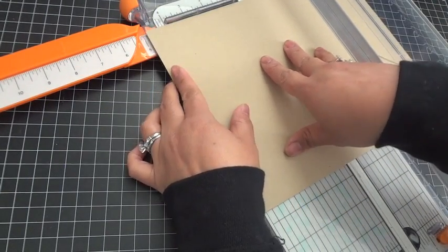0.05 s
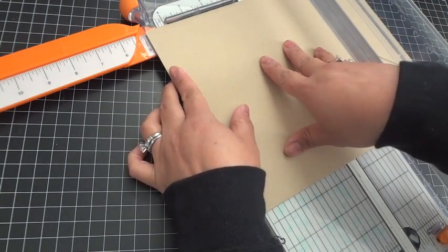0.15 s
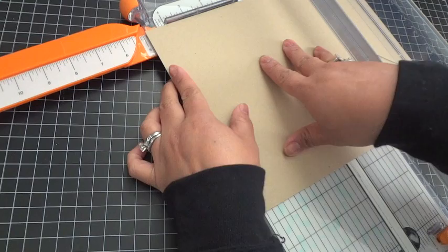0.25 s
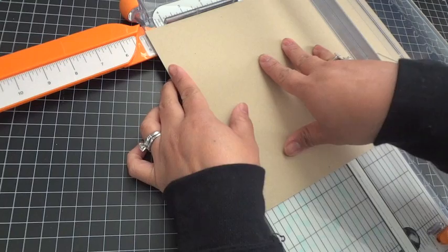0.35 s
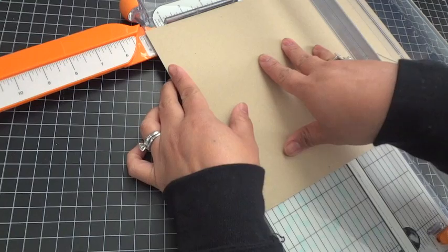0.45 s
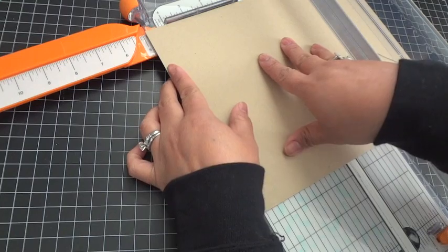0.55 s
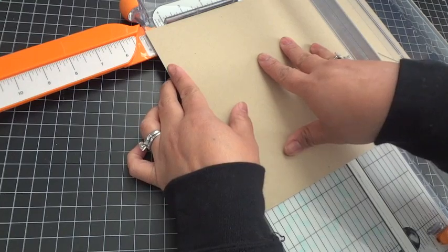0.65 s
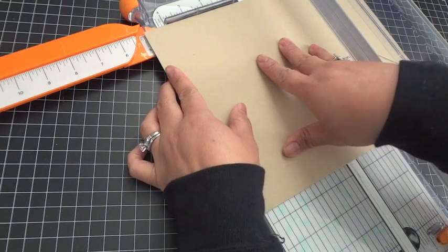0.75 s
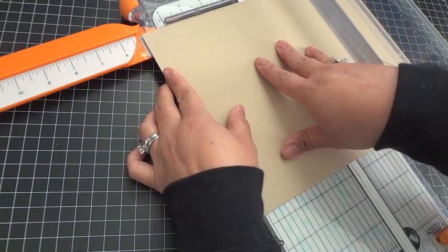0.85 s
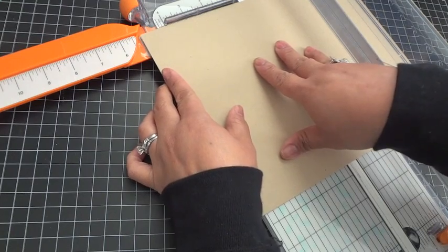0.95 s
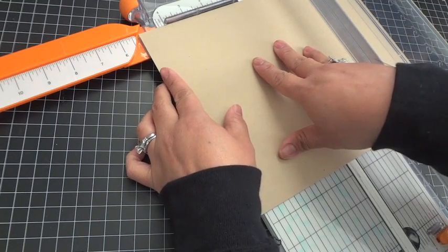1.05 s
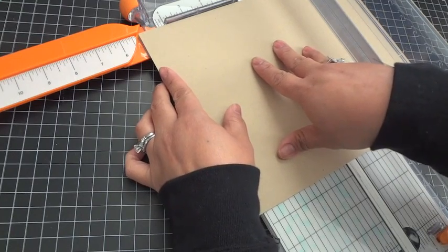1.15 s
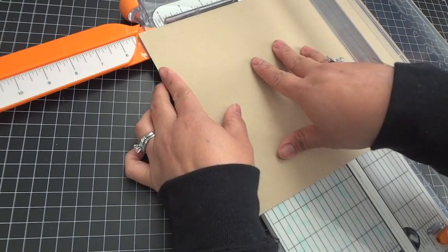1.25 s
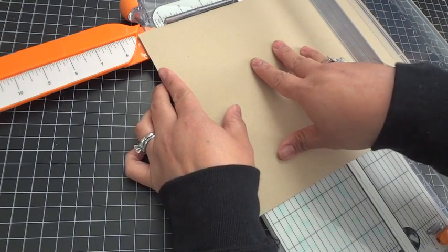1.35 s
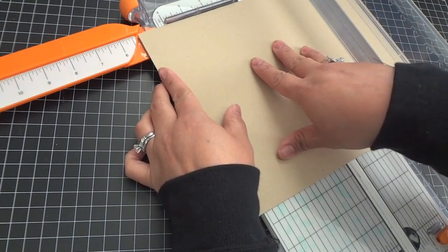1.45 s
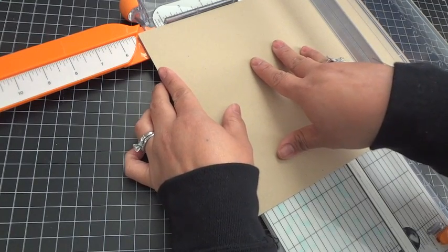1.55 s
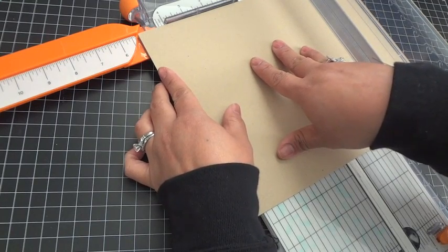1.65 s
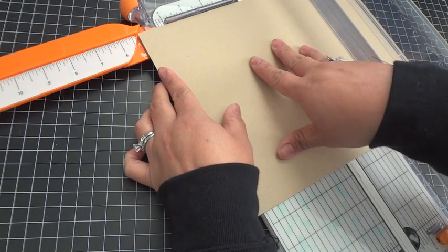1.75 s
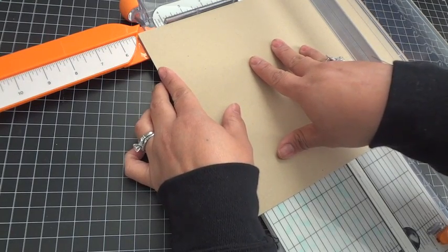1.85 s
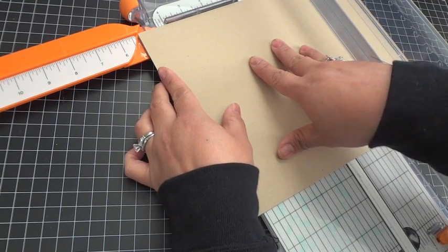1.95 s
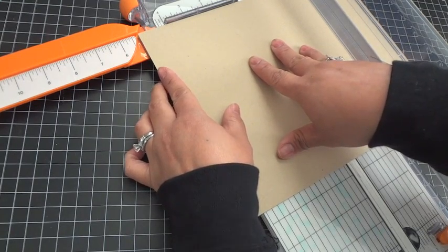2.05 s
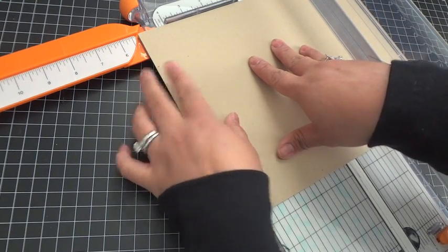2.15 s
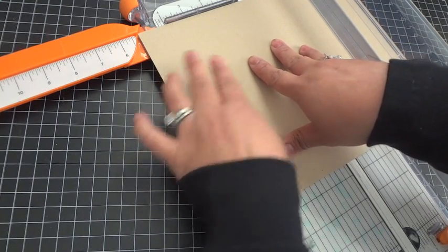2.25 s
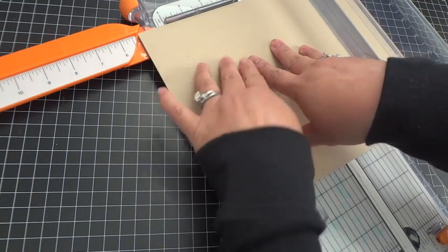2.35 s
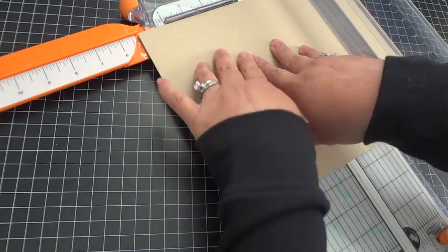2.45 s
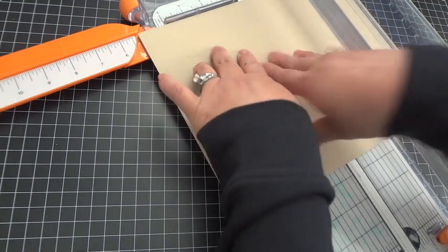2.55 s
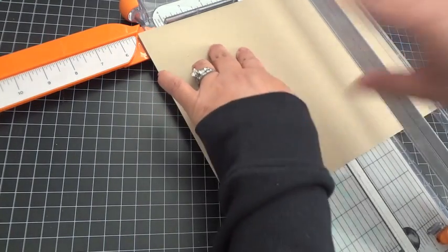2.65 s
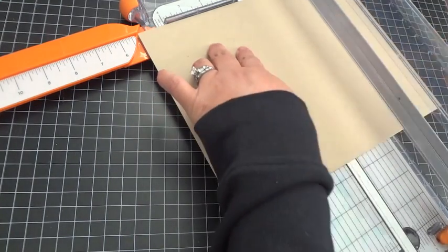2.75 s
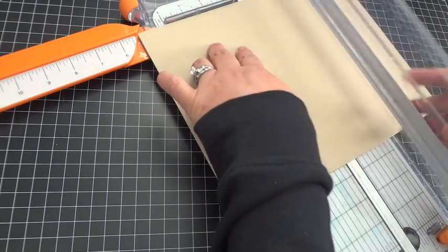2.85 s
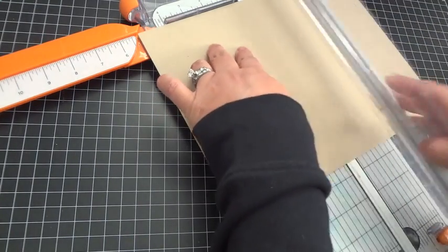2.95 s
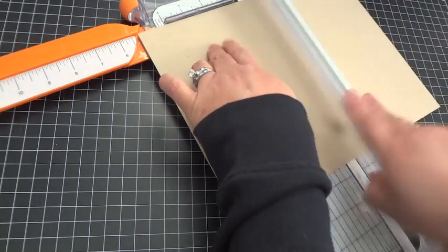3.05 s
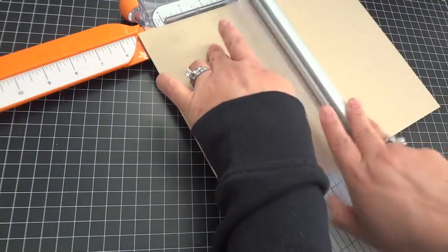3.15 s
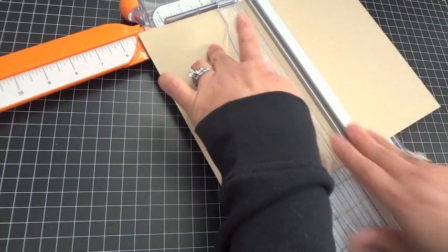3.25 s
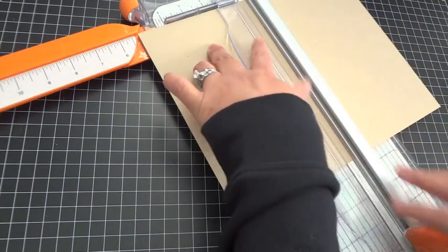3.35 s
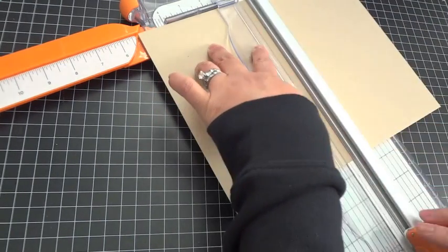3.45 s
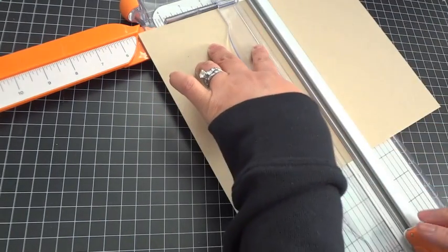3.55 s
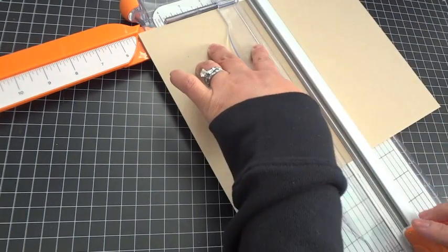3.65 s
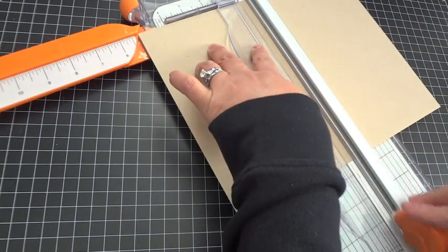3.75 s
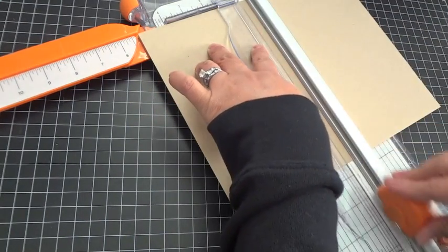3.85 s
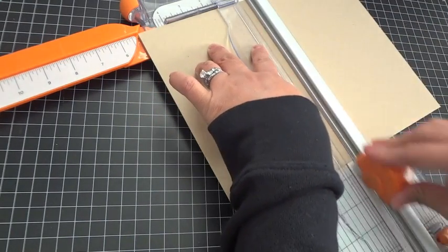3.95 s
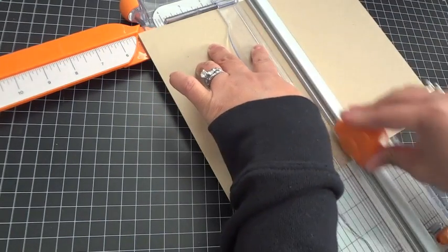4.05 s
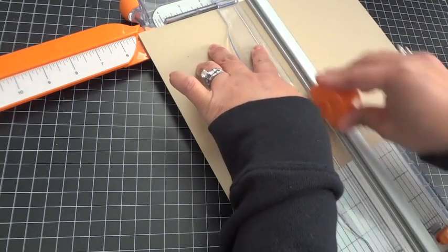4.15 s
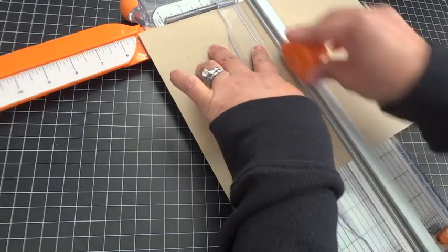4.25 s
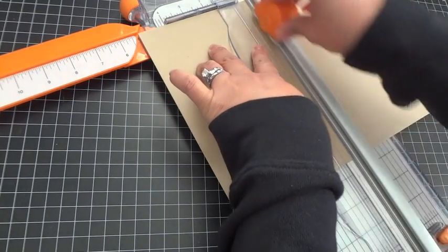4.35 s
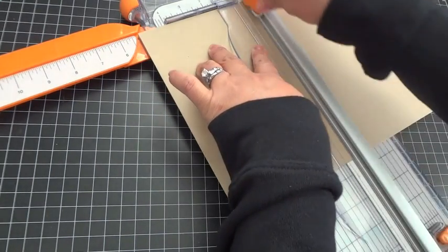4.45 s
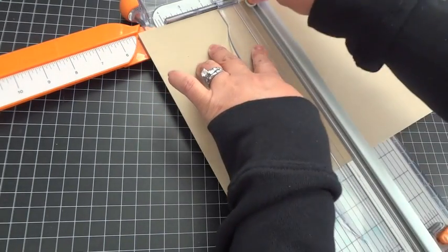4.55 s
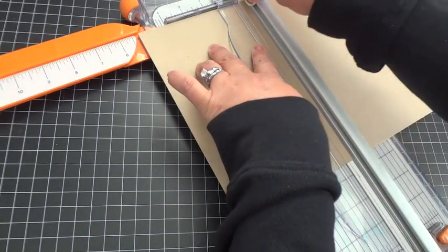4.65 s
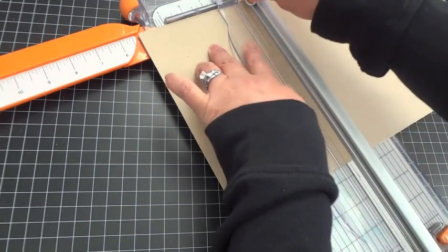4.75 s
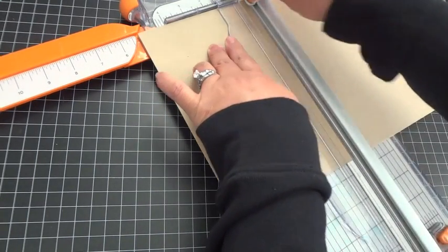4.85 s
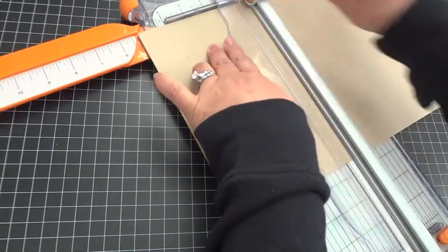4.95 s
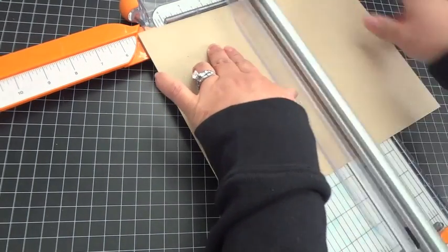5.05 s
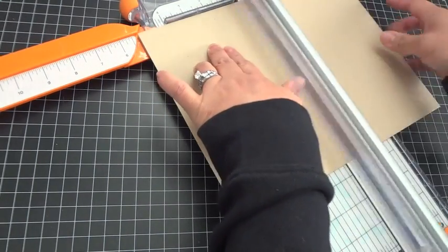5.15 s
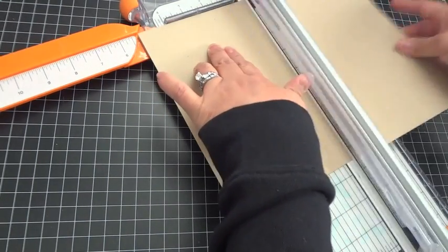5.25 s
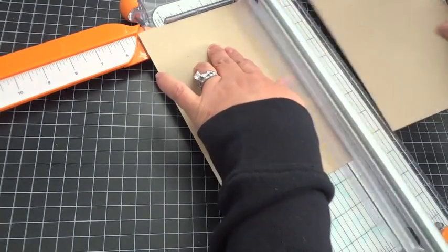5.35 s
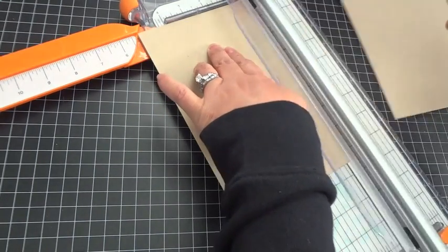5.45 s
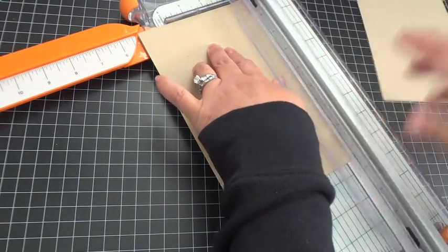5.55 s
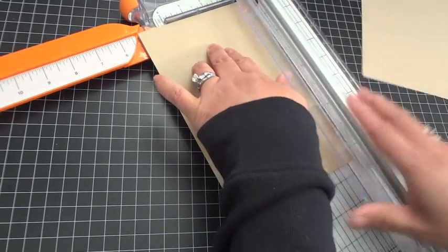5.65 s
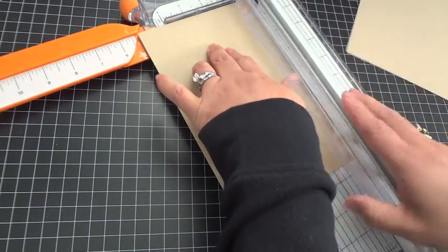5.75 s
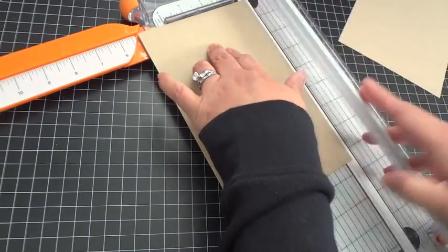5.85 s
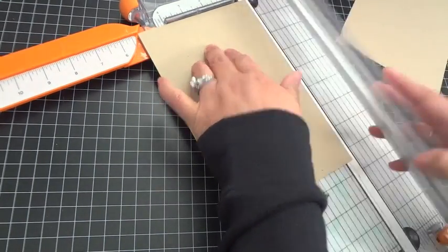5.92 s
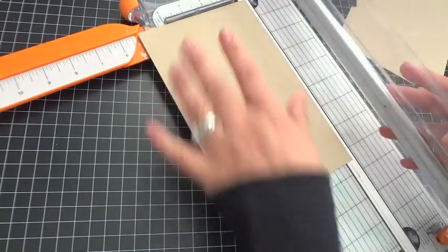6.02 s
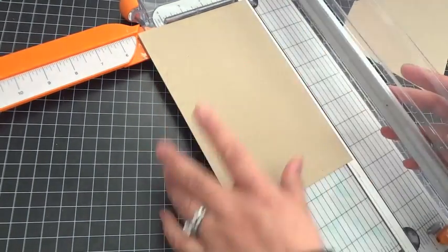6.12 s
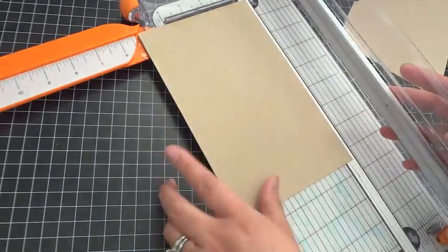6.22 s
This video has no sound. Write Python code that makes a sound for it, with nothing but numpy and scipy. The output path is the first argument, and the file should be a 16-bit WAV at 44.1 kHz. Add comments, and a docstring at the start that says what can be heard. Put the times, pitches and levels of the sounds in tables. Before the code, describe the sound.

A close stereo view of a plastic paper trimmer on a table in a small room, over soft hiss and an extremely high, faint steady whine. A crisp click at 0.04 s and another at 0.63 s; whispery card rubbing with tiny ticks at 0.8-1.0 s, then near quiet, with faint rubs around 2.5 s. From 2.9 s the rail comes down: a light clack, a harder cluster near 3.1 s, and the loudest closing snap at 3.28 s, ringing briefly. Dry little carriage clicks at 3.5-3.6 s and 3.93 s. The blade stroke swells from about 4.0 s, bites card at 4.1 s, gets brighter with a rising bed ring, and fades by 4.6 s. Soft knocks precede a violent bright crack at 5.08 s, then lighter taps and scuffing to 5.5 s, a click at 5.6 s, and faint knocks around 5.8 s before quiet.

```python
"""In a small room, a sheet of card is lined up in a plastic paper trimmer on a craft table.
The clear rail swings down and snaps shut, the blade carriage slides along it and slices the card,
then the rail is pulled open with a clatter. Knocks are short noise bursts with ringing tones added;
sliding, cutting and rubbing are crowds of tiny clicks, each coloured by a filter.
Behind them lie faint filtered noise and a thin electronic whine of two steady tones."""
import sys
import numpy as np
from scipy import signal
from scipy.fft import rfft, irfft, next_fast_len
from scipy.io import wavfile
from scipy.ndimage import uniform_filter1d, map_coordinates

SR = 44100
rng = np.random.default_rng(int(sys.argv[2]) if len(sys.argv) > 2 else 0)


def to_wav(sig):
    """Store sig (one row per channel, or 1-D mono) as 16-bit WAV at the path in sys.argv[1].

    Samples outside -1..1 are clipped; the rate is SR.
    """
    pcm = np.clip(np.atleast_2d(sig), -1, 1) * 32767
    pcm = np.round(pcm).astype(np.int16)
    wavfile.write(sys.argv[1], SR, pcm.T)  # frames by channels


N = 277124  # length in samples
TIME = np.arange(N) / SR  # seconds


def amp(db):
    """Turns decibels into a gain."""
    return 10 ** (np.asarray(db) / 20)


def unit(x):
    """Scales a sound to an rms of 1."""
    return x / np.sqrt(np.mean(x ** 2) + 1e-20)


def read(points, hz):
    """Reads a table by pitch, with straight lines over log frequency."""
    f, value = np.transpose(points)
    return np.interp(np.log(hz + 1), np.log(f + 1), value)


def add(mix, s, sound):
    """Lays a sound into the mix, starting at s seconds."""
    part = mix[max(round(s * SR), 0):][:len(sound)]
    part += sound[:len(part)]


def colour(x, points, peaks=()):
    """Filters by a smooth spectrum, with resonance peaks on top."""
    size = next_fast_len(len(x) + 2048)
    hz = np.fft.rfftfreq(size, 1 / SR)
    db = read(points, hz)
    for f, width, lift in peaks:
        db = db + lift / (1 + (2 * (hz - f) / width) ** 2)
    return irfft(rfft(x, size) * amp(db), size)[:len(x)]


def band(x, low_hz, high_hz, order=2):
    """Keeps only the pitches between two limits."""
    edges = [low_hz, min(high_hz, .49 * SR)]
    return signal.sosfilt(signal.butter(order, edges, "band", fs=SR, output="sos"), x)


def grains(per_s, spread_db):
    """Tiny slips and snaps at random times, most small and a few large."""
    size = amp(spread_db * np.minimum(rng.exponential(1, N), 4))
    sign = rng.choice([-1, 1], N)
    happens = rng.random(N) < per_s / SR
    return unit(size * sign * happens)


def burst(db, low_hz, high_hz, t60, order=2, rise_s=0.00079):
    """A dense cluster of modes struck at once, made from noise; db is the rms of its first 12 ms."""
    t = np.arange(SR // 4) / SR
    swell = (1 - np.exp(-t / rise_s)) * amp(-60 * t / max(t60, .003))
    ring = band(rng.choice([-1, 1], len(t)) * swell, low_hz, high_hz, order)
    return amp(db) * ring / np.sqrt(np.mean(ring[t < .012] ** 2))


def struck(modes):
    """Modes set going at once, each a sine that dies away by itself."""
    t = np.arange(SR // 3) / SR
    out = np.zeros(len(t))
    for hz, db, t60 in modes:
        swell = 1 - np.exp(-t * hz / 2)
        out += amp(db - 60 * t / t60) * swell * np.sin(2 * np.pi * hz * t)
    return out


CLACK_HZ, CLACK_OCTAVES = 2210, 0.9  # pitch of the softest clack, and how far above it the hardest lies
# edge tick against the clack for the softest blow, and what the hardest adds
TICK_DB, TICK_RANGE_DB = -17, 15.5
HEAVY_S = .1  # die-away time of a long, heavy blow
THUMP_HZ, THUMP_SLOPE = 332, 0.23  # table's thump for a heavy blow; shorter blows raise it by this power
# blows on the trimmer: start_s, level_db (of the clack), hardness (0-1),
# bed_db and table_db (against the clack), t60_s (time for the clack to fall 60 dB)
KNOCKS = [(0.036, -38.5, 0.7, -9, -19.5, 0.024), (0.634, -40.5, 0.81, -4, -25, 0.024),
          (2.165, -65.5, 0, 9.5, -6, 0.029), (2.873, -61.5, 0.9, -3, -11, 0.014),
          (2.903, -45, 0.86, 0, -16.5, 0.03), (3.013, -59.5, 0, 2.5, 2, 0.028),
          (3.07, -55.5, 1, 1, -2.5, 0.064), (3.0981, -31.5, 0.6, -2, -20, 0.043),
          (3.104, -35, 1, -4.5, -15, 0.089), (3.131, -44, 0.73, 5, -9.5, 0.066),
          (3.262, -40, 0.63, -9.5, -30, 0.18), (3.281, -25.5, 0.82, -5, -14.5, 0.074),
          (3.296, -26, 0.82, -3, -22, 0.21), (4.665, -54, .5, -2.5, -11.5, 0.035),
          (4.777, -54, 0, 3.5, -14, 0.023), (4.924, -53.5, 0.5, -9, -8.5, 0.042),
          (4.997, -40.5, 0.8, -11, -7.5, 0.0088), (5.011, -45, 0.47, -9, -13, 0.073),
          (5.072, -27.5, 0.18, -4, -43, 0.0047), (5.077, -25.5, 1, -38, -28, 0.041),
          (5.088, -22, .85, -18.5, -35, 0.2), (5.171, -40, 0.5, -3, 2.5, 0.015),
          (5.292, -47, 0.33, -3, -27, 0.024), (5.305, -49.5, 0.8, -6, -22, 0.15),
          (5.329, -37.5, 0, -2, -15.5, 0.017), (5.45, -45.5, 0, -7, -21, 0.023),
          (5.515, -45.5, 0, -12, -16, 0.13), (5.755, -47.5, 0.5, -3, -1.5, 0.059),
          (5.796, -49, 0.29, -6, -16, 0.059), (5.824, -56, 0, 4.5, -3, 0.014),
          (5.8937, -57, 0.97, 8, -4, 0.035)]


def blows(bass_hold=1.52, tick_hold=0.88):
    """Each blow shakes table, bed and rail; harder ones are brighter, and the thump lasts longest."""
    out = np.zeros(N)
    for s, db, hardness, bed_db, table_db, t60 in KNOCKS:
        clack_hz = CLACK_HZ * 2 ** (CLACK_OCTAVES * hardness)
        thump_hz = THUMP_HZ * (HEAVY_S / t60) ** THUMP_SLOPE
        tick_db = TICK_DB + TICK_RANGE_DB * hardness
        thump = burst(db + table_db, thump_hz / 1.45, thump_hz * 1.45, t60 * bass_hold, 3, rise_s=.0012)
        bed = burst(db + bed_db, 820, 1280, t60 * 1.1, 3, rise_s=.0008)
        clack = burst(db, clack_hz / 1.95, clack_hz * 1.55, t60, 3, rise_s=.0014)
        tick = burst(db + tick_db, 6000, 14500, t60 * tick_hold, rise_s=.0009)
        for layer in (thump, bed, clack, tick):
            add(out, s, layer)
    return out


# boom of the base on the table: pitch_hz, level_db (against a heavy blow's level on the bed), t60_s
BASE_MODES = [(101.4, -7, 0.099), (195.4, -6, 0.11), (233, -6.5, 0.13), (423.6, -9, 0.14),
              (923, 3.5, 0.059)]


def base():
    """The base booms in step with the push on the bed: its force times its length."""
    out, boom = np.zeros(N), struck(BASE_MODES)
    for s, db, _, bed_db, _, t60 in KNOCKS:
        add(out, s, amp(db + bed_db) * t60 / HEAVY_S * boom)
    return out


# what the trimmer rings with after every blow: pitch_hz, level_db (before ring_db is added), t60_s
TRIMMER_MODES = [(393, -48, 0.13), (900, -39, 0.45), (1070, -21, 0.32), (1124, -5.5, 0.037),
                 (2000, 3, 0.067), (2180, 8, 0.067), (3560, -46, 0.17), (4000, -27, 0.055)]


def ringing(x, ring_db=-3.0):
    """The trimmer's long modes, driven by the blows, sing on after them."""
    t = np.arange(SR // 2) / SR
    modes = np.zeros(len(t))
    for hz, db, t60 in TRIMMER_MODES:
        even = 2 * np.log(1000) / (t60 * SR)  # makes level_db the mode's gain at resonance
        modes += amp(db - 60 * t / t60) * np.sin(2 * np.pi * hz * t) * even
    return amp(ring_db) * signal.oaconvolve(x, modes)[:N]


def flutter(rate_hz, depth_db):
    """A gain that wanders at random."""
    knots = np.arange(0, TIME[-1] + 1, 1 / rate_hz)
    return amp(depth_db * np.interp(TIME, knots, rng.standard_normal(4096)[:len(knots)]))


def shifting(x, patch_db):
    """Resonances come and go in patches of about 400 Hz by 50 ms as the blade travels; the top stays even."""
    hz, _, z = signal.stft(x, SR, nperseg=512)
    patches = uniform_filter1d(rng.standard_normal(z.shape), size=5, axis=0)
    patches = uniform_filter1d(patches, size=9, axis=1)
    depth_db = patch_db / (1 + (hz[:, None] / 10000) ** 4)
    return unit(signal.istft(z * amp(depth_db * unit(patches)), nperseg=512)[1][:N])


# the carriage is pushed faster, then braked; the end values hold outside: time_s, speed (0-1)
SPEED = [(3.66, 0.06), (4.39, 0.95), (4.47, 0.89), (4.655, 0.01)]
# how much of the blade is in the card: time_s, share (0-1)
IN_CARD = [(4.104, 0), (4.118, 1), (4.548, 1), (4.568, 0)]
# carriage on the rail, rasping in two bands: pitch_hz, level_db
SLIDE_COLOUR = [(150, -40), (450, -22), (740, -5), (950, -14), (1220, -6), (1550, -13), (1980, 3),
                (2650, 2), (3150, -11), (3550, -1), (4500, -3), (6000, -8), (16000, -18)]
# tearing fibres: pitch_hz, level_db
CUT_COLOUR = [(600, -46), (1200, -17.5), (1620, -3), (2050, -9.5), (2560, -9), (3220, -10.5), (4600, -6),
              (7300, -9.5), (9700, -10), (14700, -10), (16000, -16)]
# resonances of the rail that the cut excites: pitch_hz, width_hz, lift_db
RAIL_PEAKS = [(1610, 120, 2), (2050, 160, 3), (2600, 260, 4), (4010, 100, 3), (4650, 350, 3),
              (5570, 130, 3), (6240, 100, 2), (7150, 300, 2)]
# ring of the bed: pitch_hz (before stiffening), level_db
BED_COLOUR = [(450, -26), (680, -21.5), (800, -14.5), (900, -0.5), (1000, 5.5), (1160, 11), (1350, -2),
              (1700, 0.5), (3000, -63)]
# the bed rings higher as the blade nears the hinge: time_s, pitch_factor
BED_STIFFENING = [(4.2, 0.81), (4.42, 0.95), (4.58, 1.1)]
# low drumming of the bed on the table: pitch_hz, level_db
ROLL_COLOUR = [(30, -48), (65, -12), (100, 1), (130, 4.5), (215, 8.5), (300, -4), (420, -8.5), (650, -5.5),
               (1200, -45)]
FRICTION_DB, SPEED_POWER = -30, 1.99  # bare rail at full speed; friction grows as this power of speed
CUTTING_DB, BITE_DB = 6.5, 3.0  # extra level in the card, and size of the jump as the blade bites
FIZZ_DB = 0.5  # fizz of the bare rail against its rasp at full speed
# bed's ring against the friction at the hinge, and how much less at the near end
BED_AT_HINGE_DB, BED_FALL_DB = -1, 40.5
# drumming: level at full speed, loudest place and reach (shares of the rail)
SAG_DB, SAG_PLACE, SAG_WIDTH = -50.5, 0.68, 0.16


def stroke():
    """The carriage scrapes the rail, louder with speed; in the card, snapping fibres take over."""
    speed = np.clip(np.interp(TIME, *np.transpose(SPEED)), 0, None)
    place = np.cumsum(speed) / np.sum(speed)  # 0 at the near end, 1 at the hinge
    in_card = np.clip(np.interp(TIME, *np.transpose(IN_CARD)), 0, 1)
    friction = amp(FRICTION_DB + CUTTING_DB * in_card) * speed ** SPEED_POWER

    slide = shifting(colour(grains(7000, 1.7), SLIDE_COLOUR), 2.0)
    fizz = unit(band(grains(13000, 1.5), 4500, 15000))
    fibres = shifting(colour(grains(13000, 1.8), CUT_COLOUR, RAIL_PEAKS), 3.2)
    bare_rail = slide + amp(FIZZ_DB) * speed * fizz
    scrape = np.sqrt(1 - in_card) * bare_rail + np.sqrt(in_card) * fibres

    # dips then jumps as the blade enters; rises then dips as it leaves
    bite = amp(BITE_DB * (in_card - uniform_filter1d(in_card, size=4000)) * 2)
    drag = flutter(130, .8) * bite  # uneven resistance

    # reading the ring faster raises its pitch
    pace = np.cumsum(np.interp(TIME, *np.transpose(BED_STIFFENING)))
    bed_ring = map_coordinates(unit(colour(grains(4000, 1.6), BED_COLOUR)), [pace])
    bed_ring = bed_ring * amp(BED_AT_HINGE_DB - BED_FALL_DB * (1 - place))

    sag = amp(SAG_DB) * speed * np.exp(-((place - SAG_PLACE) / SAG_WIDTH) ** 2)
    rumble = unit(colour(grains(1500, 0.63), ROLL_COLOUR)) * sag
    return drag * (friction * (scrape + bed_ring) + rumble)


FAVOUR_OCTAVES = .3  # modes this far from the favoured pitch ring about 9 dB less
# the carriage clicks in its play on the rail: start_s, level_db, favoured_hz
CARRIAGE_CLICKS = [(2.96, -48, 2200), (2.972, -63, 2230), (3.039, -59, 2500), (3.476, -55, 3070),
                   (3.491, -35.5, 2400), (3.504, -54, 2340), (3.533, -47, 3170), (3.582, -42, 1940),
                   (3.635, -50, 3050), (3.931, -45, 2404), (4.121, -36, 2810), (5.591, -43, 3580)]
# ring of the carriage: pitch_hz, level_db (against the click, at the favoured pitch), t60_s
CARRIAGE_MODES = [(2143, 5, 0.057), (2210, 6.5, 0.038), (2490, -13, 0.048), (2530, 6, 0.054),
                  (3590, 1, 0.056), (4440, -18, .07)]


def carriage(low_hz=1900, high_hz=5000, t60=.017, tick_db=-20, bed_db=-14):
    """Dry clicks of the small plastic carriage, ringing most near the pitch each click favours."""
    out = np.zeros(N)
    for s, db, favoured_hz in CARRIAGE_CLICKS:
        add(out, s, burst(db, low_hz, high_hz, t60, order=4, rise_s=0.0008))
        add(out, s, burst(db + tick_db, 6000, 14500, t60))
        add(out, s, burst(db + bed_db, 780, 1280, t60))
        for mode in CARRIAGE_MODES:
            favour = np.exp(-(np.log2(mode[0] / favoured_hz) / FAVOUR_OCTAVES) ** 2)
            add(out, s, amp(db) * favour * struck([mode]))
    return out


RUB_ATTACK_S, RUB_RELEASE_S = 0.013, 0.0065


def pressure(strokes):
    """Each rub swells, holds and lets go."""
    out = np.zeros(N)
    for s, length, db in strokes:
        swell = np.clip((TIME - s) / RUB_ATTACK_S, 0, 1)
        let_go = np.exp(-np.clip((TIME - s - length) / RUB_RELEASE_S, 0, 20))
        out += amp(db) * swell * let_go
    return out


# card and fingers slide over the bed: start_s, length_s, level_db (before rub_db is added)
RUBS = [(0.77, 0.18, -54.5), (0.95, 0.037, -49.5), (2.445, 0.073, -64), (2.595, 0.039, -51)]
# colour of these rubs: pitch_hz, level_db
RUB_COLOUR = [(800, -11.5), (3000, -6.5), (4200, 3.5), (5300, 5.5), (8000, 3), (10000, 0.5), (15500, -6)]
# the card's edge catches and lets go: start_s, level_db (before tick_db is added)
CARD_TICKS = [(0.122, -43), (0.783, -45.5), (0.816, -49), (0.959, -44), (0.975, -37.5), (0.994, -47),
              (1.425, -55.5), (6.022, -55)]


def card(rub_db=-0.5, tick_db=-4.0):
    """Card whispers over the bed in many tiny slips, with little catches of its edge."""
    slips = grains(3500, 3.5)
    out = amp(rub_db) * pressure(RUBS) * unit(colour(slips, RUB_COLOUR))
    for s, db in CARD_TICKS:
        add(out, s, burst(db + tick_db, 4300, 8600, 0.016, rise_s=0.000067))
    return out


# the rail's hinge and the card scuff while moved: start_s, length_s, level_db (before scuff_db is added)
SCUFFS = [(2.9, 0.16, -59), (3.07, .025, -60), (3.245, 0.038, -47), (4.9, 0.13, -59.5), (5.24, 0.191, -56)]
# colour of these scuffs: pitch_hz, level_db
SCUFF_COLOUR = [(200, -14), (600, -9), (1000, 0), (1500, -3), (2300, 0), (3000, -9), (5500, -15),
                (9000, -23), (15000, -28)]


def scuffs(scuff_db=0.5):
    """Plastic and card rub softly, in small separate slips."""
    slips = grains(900, 3.2)
    return amp(scuff_db) * pressure(SCUFFS) * unit(colour(slips, SCUFF_COLOUR))


# how long the room's echoes take to fall 60 dB: pitch_hz, t60_s
ROOM_T60 = [(150, 0.21), (400, 0.18), (1000, 0.26), (3000, 0.27), (7000, 0.29), (15000, 0.26)]


def room(x, wet_db=-6.0, first_s=0.0017, count=3):
    """Reflections from table and near walls die band by band; several patterns fade in and out in turn."""
    t, out = np.arange(SR // 2) / SR, np.zeros(N)
    for k in range(count):
        happens = rng.random(len(t)) < 4000 / SR  # 4000 echoes a second
        taps = rng.standard_normal(len(t)) * happens * (t > first_s)
        hz, age, z = signal.stft(taps, SR, nperseg=256)
        fade = amp(-60 * age / read(ROOM_T60, hz)[:, None])
        tail = signal.istft(z * fade, SR, nperseg=256)[1]
        # the shares' total power stays constant
        share = np.sqrt(2 / count) * np.cos(np.pi * (2 * TIME + k / count))
        out += signal.oaconvolve(x * share, tail / np.linalg.norm(tail))[:N]
    return amp(wet_db) * out


# balance between the ears: pitch_hz, left_minus_right_db
LEAN = [(100, .9), (300, -.1), (1000, -2.5), (2200, -1.2), (4500, -1.7), (9000, -.6), (15000, -.2)]
# spread between the ears: pitch_hz, side_against_mid_db
WIDTH = [(100, -31), (350, -13), (1000, -9), (2500, -15), (5000, -17), (12000, -26.5)]


def microphones(x, scatter_s=0.0025):
    """Two close capsules: the trimmer lies a little to the right, and scattered sound differs between them."""
    t = np.arange(SR // 10) / SR
    scatter = rfft(rng.standard_normal(len(t)) * t * np.exp(-t / scatter_s))
    # smears time but keeps the colour
    scatter = irfft(scatter / abs(scatter), len(t))[:len(t) // 2]
    side = colour(signal.oaconvolve(x, scatter)[:N], WIDTH)
    left = colour(x, [(hz, db / 2) for hz, db in LEAN])
    right = colour(x, [(hz, -db / 2) for hz, db in LEAN])
    return np.array([left + side, right - side])


HISS_DB = -62  # rms of the part of the hiss that both ears share
# colour of the room air and hiss: pitch_hz, level_db
HISS_COLOUR = [(15, -36), (25, -58), (53, -4), (176, -3), (207, -1), (415, -1), (450, -2.5), (501, 1.5),
               (621, 0.5), (1420, 1), (2780, -6), (5140, -8), (6720, -8.5), (13800, -12), (15000, -6)]
# two beating electronic tones: pitch_hz, level_db (rms, before the top is cut)
WHINE = [(15734.3, -66.2), (15747.3, -71.5)]


def background(side_db=0.5):
    """Room air and hiss from filtered noise, with two electronic whines beating against each other."""
    mid = unit(colour(rng.standard_normal(N), HISS_COLOUR))
    side = colour(rng.standard_normal(N), HISS_COLOUR)
    side = colour(side, [(100, -10.0), (500, 0.5), (2000, 1.5), (8000, -16.0)])  # Hz, dB
    side = amp(side_db) * unit(side)
    whine = np.zeros(N)
    for hz, db in WHINE:
        whine += amp(db) * unit(np.sin(2 * np.pi * (hz * TIME + rng.random())))
    return amp(HISS_DB) * np.array([mid + side, mid - side]) + whine


def scene():
    """Everything on the table, in the room, at the microphones."""
    hits = blows()
    table = hits + ringing(hits) + base() + carriage() + stroke() + card() + scuffs()
    return microphones(table + room(table)) + background()


def record(dry):
    """The recorder's band limit: a steep filter removes what lies above 16 kHz."""
    low_pass = signal.firwin(511, 16000, window=("kaiser", 9), fs=SR)
    return signal.oaconvolve(dry, low_pass[None], "same")


dry = scene()
out = record(dry)
to_wav(out)
```